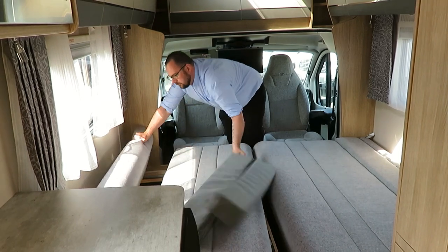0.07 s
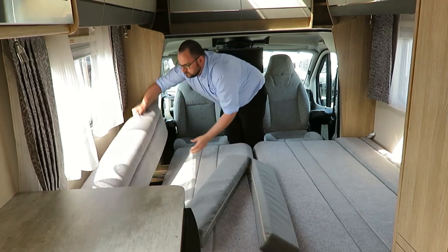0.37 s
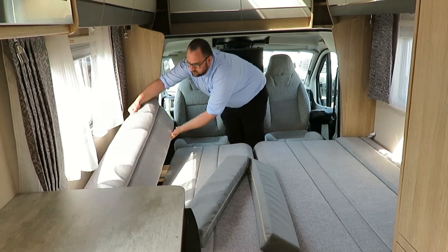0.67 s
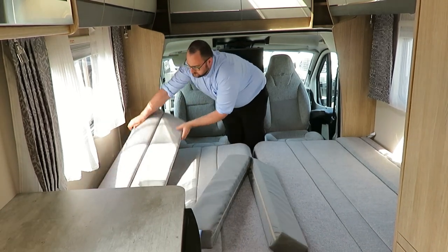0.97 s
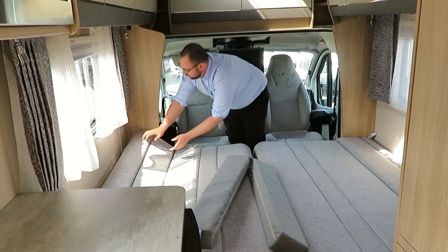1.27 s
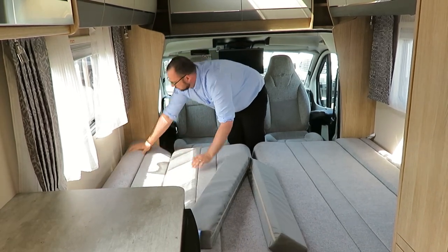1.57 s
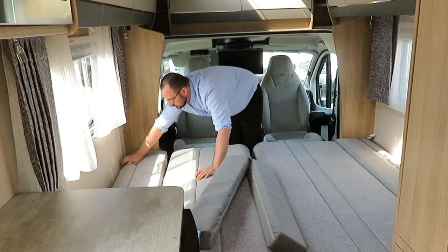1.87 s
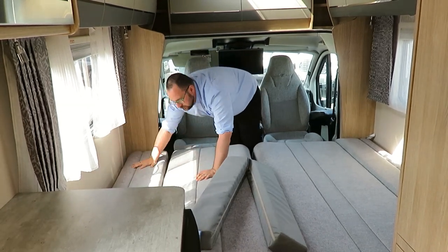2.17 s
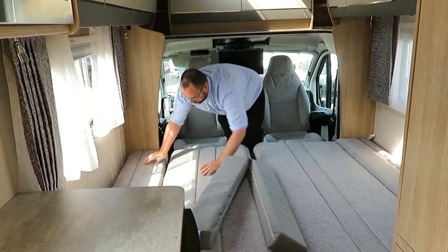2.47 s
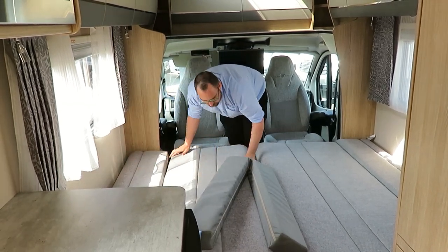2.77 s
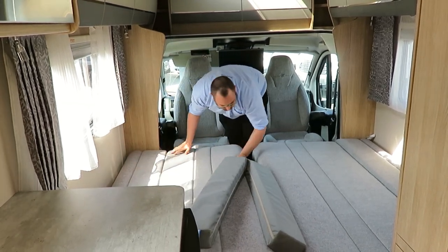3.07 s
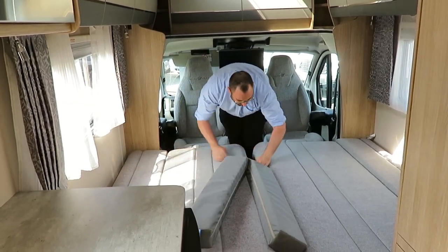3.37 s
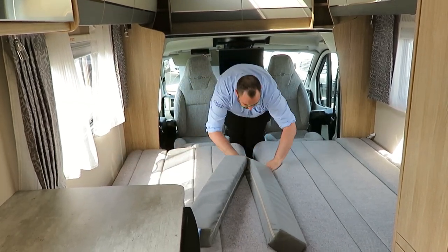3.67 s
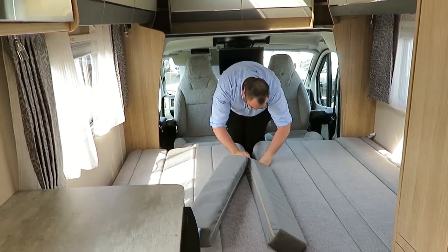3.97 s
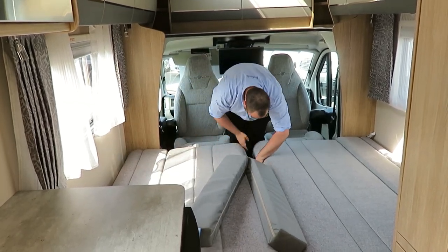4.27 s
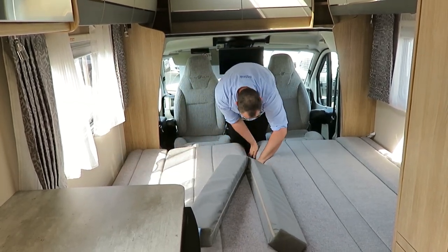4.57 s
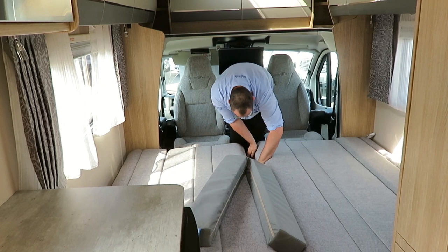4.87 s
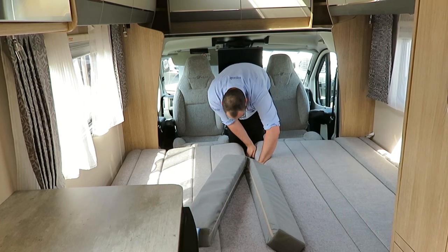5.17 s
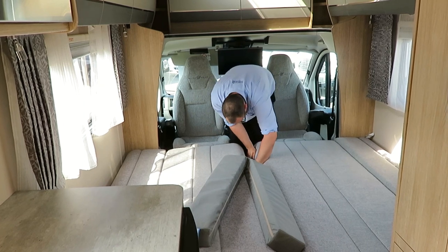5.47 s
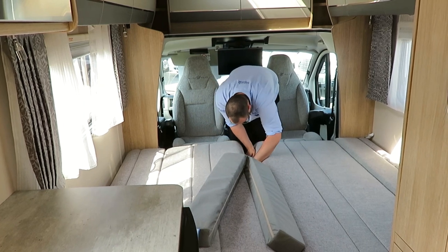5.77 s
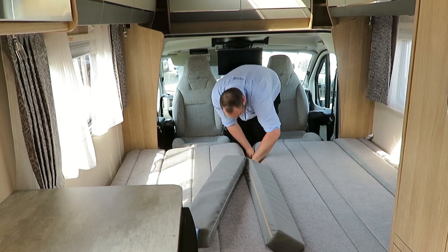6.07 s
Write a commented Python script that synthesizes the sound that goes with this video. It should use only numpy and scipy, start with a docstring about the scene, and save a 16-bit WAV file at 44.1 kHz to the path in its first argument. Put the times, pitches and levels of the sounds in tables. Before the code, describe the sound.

Upholstered cushions are handled nearby in a small, fairly dry motorhome cabin. At about 0.2 seconds a cushion thumps down and knocks hollowly against panelling, followed by bright wooden raps and a tiny tick at 0.35. Another knock comes at 0.7, and fabric drags and scuffs until about 1.4. A bright swish and soft landing at 1.6 lead to the loudest part: deep padded thuds with wooden knocks at 1.9 and 2.2, the second with a loose bench lid slapping down. Light bumps, rustling and a floor rumble follow around 3 seconds, then a thump and clack near 3.6. From 4 seconds the covers rub and scuff quietly as they are pushed into place, with a soft bump at 5.3 and a last thud and knock near 6. A faint low hum and hiss lie underneath.

```python
"""Arranging cushions in a motorhome

Upholstered seat cushions are lifted, dropped and pushed into place on wooden benches.
Foam thuds on the boards, the wood knocks, clacks and rings, and the covers drag and swish
as their weave catches and lets go. The floor rumbles under the shifting weight."""
import sys
import numpy as np
from scipy import signal
from scipy.fft import rfft, irfft
from scipy.io import wavfile

SR = 44100
rng = np.random.default_rng(int(sys.argv[2]) if len(sys.argv) > 2 else 0)


def materialize(psi):
    """Save the field psi as 16-bit PCM at rate SR to the path in sys.argv[1].

    A 1-D psi becomes a single channel; in a 2-D psi each row is a channel.
    """
    bounded = np.clip(np.atleast_2d(psi).T, -1, 1)
    quanta = np.round(bounded * 32767).astype(np.int16)
    wavfile.write(sys.argv[1], SR, quanta)


N = 269451
TIME = np.arange(N) / SR
FREQS = np.maximum(np.arange(N // 2 + 1) * SR / N, 1)

# The notes a plywood bench rings at. Each row: pitch in Hz, width in Hz, boost in dB.
BENCH_NOTES = [(383.3, 13, -4.5), (426, 53, -2), (614, 17, 6.5), (713, 180, 5), (747, 21, -4), (847, 35, 5),
               (1090, 520, 11.5), (1466, 85, 5), (2010, 25, -14), (2284, 47, 6.5), (3120, 86, 4.5)]
# The tone of a knock on a bench. Each row: frequency in Hz, relative level in dB.
KNOCK_TONE = [(60, 21.5), (150, 7), (240, 1.5), (300, 5), (400, 4), (510, -6.5), (720, -7), (1200, -19.5),
              (2500, -7), (6000, -45), (15000, -26)]


def from_db(db):
    """Turn decibels into a number to multiply a sound by."""
    return 10 ** (np.asarray(db) / 20)


def unit_power(x):
    """Scale a sound so that its average power is 1."""
    return x / np.sqrt(np.mean(x ** 2) + 1e-20)


def gain_at(points, hz):
    """Read the gain at any frequency from rows of frequency in Hz and level in dB."""
    known_hz, db = np.transpose(points)
    return from_db(np.interp(np.log(hz), np.log(known_hz), db))


def colour(points):
    """Turn a tone table into a gain for every frequency, falling steeply beyond its ends."""
    lowest_hz, highest_hz = points[0][0], points[-1][0]
    return gain_at(points, FREQS) / (1 + (FREQS / highest_hz) ** 8) / (1 + (lowest_hz / FREQS) ** 4)


def drift(rate_hz):
    """A smooth random wobble, about 1 in size; a higher rate wobbles faster."""
    step = 40  # samples between random values
    values = rng.standard_normal(N // step + 2002)
    r = np.exp(-2 * np.pi * step * rate_hz / SR)
    smooth = signal.lfilter([1], [1, -2 * r, r * r], values)[2000:]
    return np.interp(np.arange(N) / step, np.arange(len(smooth)), unit_power(smooth))


def noise(tone, grain=1, width=None):
    """Stereo noise with a given tone; grain roughens it, width spreads it between the ears."""
    # Sounds in the aisle are narrow in the bass and wide in the treble.
    # Each row: frequency in Hz, stereo width (side minus mid) in dB.
    aisle_width = [(100, -79), (200, -102), (350, -24), (700, -24), (1400, -14), (2800, -7.5), (5500, -4.5),
                   (11000, 2)]
    mid, side = rfft(rng.standard_normal((2, N)) * grain) * tone
    mid = irfft(mid, N)
    side = irfft(side * gain_at(width or aisle_width, FREQS), N)
    return (mid + side * np.array([[1], [-1]])) / mid.std()


def lowpass(x, hz, order=2):
    """Dull a sound by turning down everything above hz."""
    return signal.sosfilt(signal.butter(order, min(hz, SR / 2 - 1), fs=SR, output="sos"), x)


def resonate(x, hz, width_hz):
    """Let through a band around hz; the narrower it is, the longer it rings."""
    r = np.exp(-np.pi * width_hz / SR)
    feedback = [1, -2 * r * np.cos(2 * np.pi * hz / SR), r * r]
    return signal.lfilter(np.array([1, 0, -1]) * (1 - r * r) / 2, feedback, x + 1e-18)


def glide(x, start_hz, end_hz, width_hz, size=64):
    """Make a sound ring at a pitch that slides, in steps of size samples."""
    r = np.exp(-np.pi * width_hz / SR)
    state, out = np.zeros((2, 2)), []
    starts = range(0, x.shape[-1], size)
    for i, hz in zip(starts, np.geomspace(start_hz, end_hz, len(starts))):
        feedback = [1, -2 * r * np.cos(2 * np.pi * hz / SR), r * r]
        block, state = signal.lfilter([1, 0, -1], feedback, x[:, i:i + size], zi=state)
        out.append(block)
    return np.hstack(out)


def fade(t, t60):
    """Die away smoothly; t60 is the fade time, the time it takes to drop by 60 dB."""
    return np.exp(-np.log(1000) * t / t60)


def add(out, start, sound):
    """Mix a sound into out, start seconds in."""
    i = int(start * SR)
    out[..., i:i + sound.shape[-1]] += sound[..., :N - i]


def aftermath(hits, t60):
    """Power that jumps up and dies away at each hit (start in seconds, level in dB)."""
    power, t = np.zeros(N), TIME[:SR]
    for start, db in hits:
        add(power, start, (from_db(db) * fade(t, t60) * (1 - np.exp(-t / 0.0029))) ** 2)
    return power


def bench_tone():
    """The peaks and dips that the benches give to any sound passing through them."""
    return from_db(sum(db / (1 + (2 * (FREQS - hz) / width) ** 2) for hz, width, db in BENCH_NOTES))


def walls(count=14, latest_s=0.022, echo=0.14):
    """Quick echoes off the close walls and ceiling boost some frequencies and weaken others."""
    echoes = np.zeros(N)
    echoes[(rng.uniform(0.001, latest_s, count) * SR).astype(int)] = echo * rng.choice([-1, 1], count)
    echoes[0] = 1
    return np.abs(rfft(echoes)) ** np.clip(FREQS / 1000, 0, 1)


def blows():
    """List every landing and bump of the cushions, in rows laid out like those of bumps."""
    # A cushion drops on a bench. Each row: start in seconds, seconds from edge to flat,
    # then base values for thud level in dB, thud pitch in Hz, knock level in dB, brightness in Hz.
    drops = [(.169, 0.0049, -20.5, 138, -31.5, 656), (1.619, 0.016, -26.5, 120.5, -32.5, 800),
             (1.888, 0.023, -13, 76, -30.5, 714), (2.162, 0.02, -16.5, 86, -25, 1040),
             (3.627, 0.011, -24.5, 96.5, -38, 1000), (5.957, 0.013, -27, 85, -36.5, 1000)]
    # It lands edge first, then flat, then bounces. Each row: delay in edge-to-flat times,
    # thud change in dB, pitch multiplier, knock change in dB, brightness multiplier.
    landing = [(0, -1, 0.733, -4.5, 1.7), (0.999, 1, 1.24, 2, 0.85), (2.799, -5, 1.21, -10.5, 0.5)]
    # A hand or corner bumps a cushion. Each row: start in seconds, relative thud level in dB,
    # thud pitch in Hz, relative knock level in dB, knock brightness in Hz.
    bumps = [(.103, -31, 290, -40.5, 740), (.465, -41, 152, -64, 500), (.683, -25.5, 164, -44, 1350),
             (.85, -32, 174, -65, 900), (.885, -33, 188, -67, 600), (1.52, -26, 102.5, -72, 520),
             (1.797, -15.5, 98.4, -38.5, 550), (1.899, -18, 310, -31, 500), (1.908, -19.5, 165, -36, 400),
             (2.018, -20.5, 46.2, -44, 390), (2.16, -17.5, 62, -31, 500), (2.204, -24, 195, -33.5, 600),
             (2.236, -16, 90, -36.5, 500), (2.383, -36, 153, -42.5, 448), (2.416, -29, 46.7, -49.5, 610),
             (2.853, -40, 118, -47, 650), (2.969, -22, 38, -38, 694), (3.023, -50, 38.3, -40, 504),
             (3.068, -32, 38.8, -44, 640), (3.118, -24.5, 47, -43.5, 550), (3.199, -38, 120, -43.5, 440),
             (3.53, -29.5, 65, -57, 400), (3.599, -33, 53, -33.5, 250), (3.658, -27, 195, -37, 420),
             (3.731, -25.5, 176, -43, 1310), (4.687, -39, 121, -54, 350), (4.728, -41, 151, -67, 350),
             (5.256, -24, 63, -47.5, 600), (5.291, -26, 59.7, -62, 400), (5.962, -25, 54, -48, 400),
             (5.967, -28.5, 167, -49, 600)]
    contacts = [(start + delay * lag, thud_db + thud_step, hz * pitch,
                 knock_db + knock_step, bright_hz * brightness)
                for start, lag, thud_db, hz, knock_db, bright_hz in drops
                for delay, thud_step, pitch, knock_step, brightness in landing]
    return contacts + list(bumps)


def background_noise(level_db=-53.5):
    """A quiet, steady low hum with faint, wide microphone hiss."""
    # Each row: frequency in Hz, relative level in dB.
    background_tone = [(12, -57), (20, 0), (59, 9), (147, -14.5), (242, -7.5), (457, -7), (525, -17),
                       (1110, -26), (12400, -53.5), (15000, -74)]
    # Each row: frequency in Hz, stereo width (side minus mid) in dB.
    background_width = [(60, -40), (110, -12.5), (180, 2.5), (330, -2), (1000, 12.5), (12000, 21.5)]
    return from_db(level_db) * noise(colour(background_tone), width=background_width)


def floor_rumble(shift_gain_db=1.0, shake_db=-12.5, shake_t60=0.52):
    """The floor flexes under the shifting weight and shakes after each blow."""
    # Each row: time in seconds, relative rumble level in dB.
    weight_shifts = [(0.0, -49.5), (.3, -33.5), (.5, -44.5), (.75, -48), (1.3, -44), (1.44, -52),
                     (1.7, -37.5), (2.05, -38.5), (2.45, -39), (2.78, -51.5), (2.99, -29), (3.25, -49.5),
                     (3.48, -48.5), (3.7, -42), (4.1, -55.5), (4.3, -47), (4.75, -42.5), (4.93, -53),
                     (5.32, -40), (5.7, -52), (6.11, -39)]
    # Each row: frequency in Hz, relative level in dB.
    rumble_tone = [(18, 10.5), (29, 1.5), (58, 3.5), (100, -8.5), (170, -7.5), (260, -24.5), (500, -20.5)]
    times, shift_db = np.transpose(weight_shifts)
    flexing = from_db(np.interp(TIME, times, shift_db) + shift_gain_db) ** 2
    shaking = aftermath([(start, db + shake_db) for start, db, *_ in blows()], shake_t60)
    return np.sqrt(flexing + shaking) * noise(colour(rumble_tone))


def cloth_motion(fidget_db=(-67.5, -61, -67), flap_db=(-26.5, -34.5), peak_at=0.54, linger_t60=0.081):
    """How strong swish, rustle and drag are over time, as cloth fidgets, slides and flaps."""
    # A cover or sleeve slides, swelling and dying away. Each row: start in seconds,
    # length in seconds, then relative levels in dB for swish, rustle and drag on the boards.
    strokes = [(0.0, 0.08, -61, -56.5, -52.5), (0.068, 0.16, -56.5, -51.5, -43.5),
               (0.219, 0.24, -55, -50.5, -43), (0.421, 0.071, -54, -46.5, -45),
               (0.446, 0.11, -66, -54.5, -50), (0.485, 0.64, -58.5, -58, -48.5),
               (0.822, 0.16, -54.5, -46.5, -40.5), (0.87, 0.31, -48.5, -48.5, -49),
               (1.012, 0.39, -57.5, -48, -50.5), (1.25, 0.3, -71, -70, -80), (1.502, 0.22, -54, -47, -41.5),
               (1.624, 0.29, -41, -43, -41.5), (1.862, 0.24, -61.5, -54.5, -58),
               (2.138, 0.077, -68, -53, -33.5), (2.194, 0.026, -56, -48, -60),
               (2.326, 0.16, -60.5, -56, -52), (2.854, 0.19, -55, -50, -56),
               (2.937, 0.048, -55.5, -45.5, -49), (3.037, 0.14, -53, -57, -68), (3.14, 0.13, -64, -76, -65),
               (3.444, 0.11, -66, -55.5, -51.5), (3.554, 0.14, -59, -54, -41), (3.666, 0.22, -68, -62, -48),
               (3.85, 0.17, -54.5, -66, -49.5), (4.205, 0.098, -65, -53.5, -45.5),
               (4.405, 0.39, -67, -62.5, -72), (4.978, 0.54, -71, -59.5, -51),
               (5.396, 0.36, -64.5, -63, -82), (5.83, 0.35, -77, -61.5, -53.5)]
    power = from_db(np.array(fidget_db)[:, None] + 0.8 * drift(9.6)) ** 2  # small, endless movements
    for start, length, *levels_db in strokes:
        progress = np.interp(np.linspace(0, 1, int(length * SR)), [0, peak_at, 1], [0, 0.5, 1])
        speed = np.abs(np.sin(np.pi * progress)) ** 0.9
        add(power, start, np.outer(from_db(levels_db), speed) ** 2)
    power *= from_db(0.77 * drift(34)) ** 2  # the cloth sticks and slips
    linger = fade(2 / SR, linger_t60)  # the sound hangs briefly between the walls
    power = signal.lfilter([1 - linger], [1, -linger], power, zi=linger * power[:, :1])[0]
    flaps = aftermath([(start, knock_db) for start, _, _, knock_db, _ in blows()], t60=0.11)
    power[:2] += np.outer(from_db(flap_db) ** 2, flaps)  # a flap adds swish and rustle only
    return np.sqrt(power)


def rubbing(swish, rustle, drag, fast_db=-47.0, drag_db=-2.5, rustle_db=-2.0, swish_db=-1.0):
    """The weave catches and lets go; a fast slide of cover on cover sings out near 5000 Hz."""
    # The tones of a slow swish, a fast slide, a drag on the boards and a rustle.
    # Each row: frequency in Hz, relative level in dB.
    slow_tone = [(2000, 9.5), (4000, 1), (5300, 2), (7500, 0.5), (11000, -2.5), (13500, 2.5), (15500, -13)]
    fast_tone = [(2500, -45), (4300, -9.5), (5250, 2), (6300, -4.5), (8000, -11.5), (12000, -8),
                 (15000, -19)]
    drag_tone = [(110, 18.5), (175, -1), (260, -0.5), (420, 6), (700, -2.5), (1000, -9), (1600, -10)]
    rustle_tone = [(600, 4.5), (1050, -2), (1600, -2.5), (2600, -4), (4000, -8.5), (6000, -14.5),
                   (12000, -38)]
    catches = from_db(2.5 * drift(18.6))
    fibres = from_db(-0.4 * drift(170))
    scratches = from_db(0.1 * drift(400))
    room = walls(echo=0.1)
    fast_share = (1 + np.tanh((20 * np.log10(swish) - fast_db) / 2.5)) / 2
    weave = np.sqrt(1 - fast_share) * noise(colour(slow_tone) * room, scratches)
    weave += np.sqrt(fast_share) * noise(colour(fast_tone) * room, scratches)
    wood = np.sqrt(bench_tone())  # rubbing reaches the boards only weakly, through the foam
    dragging = noise(colour(drag_tone) * wood, catches)
    rustling = noise(colour(rustle_tone) * wood * walls(), np.sqrt(catches) * fibres)
    return (drag * from_db(drag_db) * dragging + rustle * from_db(rustle_db) * rustling
            + swish * from_db(swish_db) * weave)


def crackle(tone, per_second, spread_db, t60, samples):
    """Tiny bursts of noise, random in time and size."""
    snaps = rng.random(N) < per_second / SR
    sizes = from_db(spread_db * np.minimum(rng.exponential(1, N), 3))
    bursts = signal.fftconvolve(snaps * sizes, fade(TIME[:samples], t60))[:N]
    return noise(colour(tone), bursts)


def threads(swish, gain_db=-9.5):
    """Single threads snag and flick free, giving the swish a fine, bright grain."""
    # Each row: frequency in Hz, relative level in dB.
    thread_tone = [(4000, -5), (5500, 2), (8000, -2.5), (11000, -2.5), (14500, -6)]
    flicks = crackle(thread_tone, per_second=450, spread_db=3, t60=0.003, samples=SR // 100)
    return swish * from_db(gain_db) * flicks


def crinkles(rustle, gain_db=-9):
    """Small folds in the covers snap over while they are handled."""
    # Each row: frequency in Hz, relative level in dB.
    fold_tone = [(800, 0), (1700, 12), (3500, -2.5), (8000, -7), (14000, -13)]
    snaps = crackle(fold_tone, per_second=60, spread_db=4, t60=0.093, samples=SR // 40)
    return rustle * from_db(gain_db) * snaps


def foam_thuds(rise_cycles=0.75, fade_cycles=4.82, gain_db=8.5, boom_db=12.0):
    """Foam gives way and springs back a few times; the push sets the floor and cabin air booming."""
    # The notes of the floor and air. Each row: pitch in Hz, fade time in seconds, relative level in dB.
    cabin_notes = [(29.6, 0.35, -1), (64.7, 0.13, -11), (86.8, 0.26, -5.5), (151.3, 0.16, -1.5),
                   (173.3, 0.13, -10.5), (215, 0.87, -21)]
    out, t = np.zeros(N), TIME[:SR // 3]
    for start, db, hz, _, _ in blows():
        cycles = hz * t
        envelope = (1 - np.exp(-(cycles / rise_cycles) ** 2)) * fade(cycles, fade_cycles)
        add(out, start, from_db(db + gain_db) * np.sin(2 * np.pi * cycles) * envelope)
    boom = sum(from_db(db + boom_db) * resonate(out, hz, np.log(1000) / np.pi / t60)
               for hz, t60, db in cabin_notes)
    return out + boom


def bench_knocks(low_t60=0.16, high_t60=0.12, attack_s=0.00066, slap_db=-18, gain_db=-5.5):
    """Each blow rattles the boards; padding dulls it, but a little cloth slap stays bright."""
    out, t = np.zeros((2, N)), TIME[:SR // 3]
    wood = noise(colour(KNOCK_TONE) * bench_tone() * walls())
    low = lowpass(wood, 650, order=1)
    high = wood - low
    hits = blows()
    for (start, _, _, db, bright_hz), i in zip(hits, rng.integers(0, N - len(t), len(hits))):
        part = np.s_[:, i:i + len(t)]
        ring = low[part] * fade(t, low_t60) + high[part] * fade(t, high_t60)
        ring = unit_power(ring * (1 - np.exp(-t / attack_s)))
        padded = lowpass(ring, bright_hz)
        slap = from_db(slap_db) * (ring - padded)
        add(out, start, from_db(db + gain_db) * (padded + slap))
    return out


def bench_ring(gain_db=-8.5, scatter_db=0.5):
    """The main notes of the benches sing on after each blow, with a new strength every time."""
    out, t = np.zeros(N), TIME[:SR // 3]
    hz, _, note_db = np.transpose(BENCH_NOTES)
    t60 = 0.15 * np.sqrt(700 / hz[:, None])  # low notes ring longer
    notes = np.sin(2 * np.pi * hz[:, None] * t) * fade(t, t60)
    for start, _, _, db, bright_hz in blows():
        size, direction = rng.standard_normal((2, len(hz)))
        padding = 1 / np.sqrt(1 + (hz / bright_hz) ** 4)
        strength = from_db(db + gain_db + note_db + scatter_db * size) * gain_at(KNOCK_TONE, hz)
        add(out, start, (np.sign(direction) * strength * padding) @ notes)
    return out


def cover_scuffs(judder_db=0.8, hollow_db=-11):
    """A shoved cover judders: a note slides as it tightens, over the hollow bench and a gritty rasp."""
    # Each row: start in seconds, length in seconds, level in dB, first pitch in Hz,
    # last pitch in Hz, width of the note in Hz, rasp compared with the note in dB.
    shoves = [(0.105, 0.033, -31.5, 302, 390, 50, -25), (0.404, 0.07, -41, 557, 990, 423, -8.5),
              (0.429, 0.082, -48.5, 1280, 2170, 450, -20), (0.902, 0.12, -40.5, 415, 480, 90, -23),
              (0.92, 0.08, -39.5, 627, 583, 30, -14), (1.082, 0.12, -56, 750, 1240, 400, -0.5),
              (1.178, 0.2, -54, 1430, 1700, 300, -16), (1.281, 0.069, -52.5, 420, 340, 130, -13),
              (1.548, 0.072, -47.5, 1440, 1720, 350, -16), (2.397, 0.35, -61, 1540, 1560, 250, -18),
              (2.98, 0.11, -53, 420, 390, 50, -9), (3.187, 0.17, -46, 288, 277, 55, -14.5),
              (3.203, 0.12, -53, 413, 403, 45, -24), (4.19, 0.12, -48.5, 365, 420, 320, -11.5),
              (4.26, 0.13, -46.5, 433, 400, 280, -9.5), (4.422, 0.13, -46, 506, 420, 240, -14),
              (4.552, 0.094, -46.5, 382, 500, 260, -12), (4.676, 0.064, -57, 440, 440, 130, -21),
              (5.004, 0.098, -50, 448, 448, 350, -20), (5.2, 0.091, -50, 420, 480, 403, -8)]
    out = np.zeros((2, N))
    slips = noise(walls(), from_db(judder_db * drift(61)))
    hollow = from_db(hollow_db) * unit_power(lowpass(resonate(slips, hz=165, width_hz=70), 330))
    rasp = unit_power(lowpass(resonate(slips, hz=950, width_hz=900), 1650, order=4))
    for start, length, db, start_hz, end_hz, width_hz, rasp_db in shoves:
        swell = signal.windows.tukey(int(length * SR), 0.68)
        part = np.s_[:, int(start * SR):int(start * SR) + len(swell)]
        note = glide(slips[part], start_hz, end_hz, width_hz)
        note = unit_power(lowpass(note, 0.82 * max(start_hz, end_hz)))
        add(out, start, from_db(db) * (note + hollow[part] + from_db(rasp_db) * rasp[part]) * swell)
    return out


def clacks(attack_s=0.0018, gain_db=4.5):
    """A hard edge of a cushion catches briefly on the woodwork."""
    # Each row: start in seconds, relative level in dB, pitch in Hz,
    # band width divided by pitch, fade time in seconds.
    contacts = [(.168, -42.5, 1390, 1.8, 0.088), (0.337, -34, 1800, 1.05, 0.12),
                (.344, -43, 4800, 1.4, 0.052), (.463, -43, 1930, 0.26, 0.081),
                (.679, -38, 1075, 0.082, 0.052), (0.687, -51, 4940, 1.7, 0.096),
                (0.873, -41, 1200, 0.9, 0.06), (1.622, -38, 1340, 0.81, 0.07),
                (1.892, -35.5, 2540, 0.94, 0.12), (1.941, -41, 1670, 0.6, 0.083),
                (2.163, -35, 2030, 0.65, 0.04), (2.162, -44, 7000, 1.1, 0.022),
                (2.213, -52, 8000, 1.2, .04), (2.852, -49, 590, 0.45, 0.03), (2.952, -49, 7000, 1.6, .07),
                (2.972, -48, 3000, 1.4, 0.05), (3.067, -53, 645, 0.33, 0.035),
                (3.626, -36, 1530, 0.18, 0.039), (3.628, -35, 880, 0.49, 0.066),
                (3.732, -55.5, 2280, 0.74, 0.13), (5.957, -39, 1470, 0.26, 0.068),
                (5.966, -37, 400, 0.42, 0.15)]
    out, t = np.zeros((2, N)), TIME[:SR // 4]
    wood = noise(bench_tone() * walls())
    for (start, db, hz, breadth, t60), i in zip(contacts, rng.integers(0, N - len(t), len(contacts))):
        band = resonate(wood[:, i:i + len(t)], hz, breadth * hz)
        ring = unit_power(resonate(band, hz, breadth * hz))
        add(out, start, from_db(db + gain_db) * ring * fade(t, t60) * (1 - np.exp(-t / attack_s)))
    return out


def struck(hits, notes, attack_s=0.0013, scatter_db=0.7, skew_per_hz=0.00011):
    """An object rings with its own notes at each hit; the higher the note, the more the ears differ."""
    out, t = np.zeros((2, N)), TIME[:SR // 3]
    hz, note_db, t60 = np.transpose(notes)[:, :, None]
    for start, db in hits:
        size, skew = rng.standard_normal((2, len(notes), 1))
        envelope = from_db(db + note_db + scatter_db * size) * fade(t, t60) * (1 - np.exp(-t / attack_s))
        phase, offset = 2 * np.pi * hz * t, skew * skew_per_hz * hz
        add(out, start, np.array([(envelope * np.sin(phase + ear * offset)).sum(0) for ear in (-1, 1)]))
    return out


def panel_knocks():
    """The backrest knocks against the wall panelling, which rings low."""
    # Each row: start in seconds, level in dB.
    hits = [(.171, -29), (.1775, -26.5), (.684, -31.5)]
    # Each row: pitch in Hz, relative level in dB, fade time in seconds.
    panel_notes = [(149, 7, 0.1), (205, -18, 0.056), (296, -4, 0.19), (465, -7.5, 0.083), (694, -33, .12),
                   (880, -18, .1), (1190, -15.5, 0.13)]
    return struck(hits, panel_notes)


def edge_raps():
    """A thin wooden edge is rapped and rings brightly."""
    # Each row: start in seconds, level in dB.
    hits = [(.337, -28), (.3465, -28.5), (.357, -34.5), (.464, -45), (.875, -41)]
    # Each row: pitch in Hz, relative level in dB, fade time in seconds.
    edge_notes = [(383, -12, 0.16), (642, -9.5, 0.12), (738, -7.5, 0.077), (1100, -8, 0.1),
                  (1424, -8, 0.06), (1607, -16, 0.21), (2173, -16, 0.11), (2780, -16, 0.07),
                  (2987, -7, 0.066), (3639, -16, 0.082)]
    return struck(hits, edge_notes)


def small_tick():
    """A small hard part, perhaps a zip pull, gives a short, high tick."""
    # Each row: start in seconds, level in dB.
    hits = [(.3465, -30)]
    # Each row: pitch in Hz, relative level in dB, fade time in seconds.
    tick_notes = [(5093, -18, 0.051), (5760, 0.5, 0.02), (7950, -22, .07), (8950, -6, 0.018),
                  (10600, 3, 0.018)]
    return struck(hits, tick_notes)


def slat_hits():
    """The stiff base of a cushion hits a slat and sets it ringing."""
    # Each row: start in seconds, level in dB.
    hits = [(1.627, -40), (1.891, -25), (1.942, -33.5)]
    # Each row: pitch in Hz, relative level in dB, fade time in seconds.
    slat_notes = [(341, -9, 0.12), (595, -5.5, 0.059), (603, -4.5, 0.087), (925, -13, 0.13)]
    return struck(hits, slat_notes)


def lid_slaps():
    """A loose bench lid slaps down on its frame."""
    # Each row: start in seconds, level in dB.
    hits = [(2.184, -21.5), (2.199, -29.5)]
    # Each row: pitch in Hz, relative level in dB, fade time in seconds.
    lid_notes = [(155, -13, 0.22), (210, -5, 0.24), (267, -10, 0.43), (387.7, -2, 0.15), (626, -14, .18),
                 (706, -3, 0.15), (815, -10, 0.13), (1055, -10, 0.075), (1260, -17, .09),
                 (1905, -19.5, .12)]
    return struck(hits, lid_notes)


def scene():
    """Mix blows, ringing wood, cloth and floor rumble over a quiet hum and hiss."""
    background = background_noise()
    impacts = foam_thuds() + bench_knocks() + bench_ring() + clacks()
    ringing = lid_slaps() + edge_raps() + small_tick() + panel_knocks() + slat_hits()
    swish, rustle, drag = cloth_motion()
    cloth = cover_scuffs() + rubbing(swish, rustle, drag) + threads(swish) + crinkles(rustle)
    return background + impacts + ringing + cloth + floor_rumble()


def record(dry, cutoff_hz=15400):
    """Cut away the very highest treble steeply."""
    return signal.sosfilt(signal.ellip(10, 0.1, 90, cutoff_hz, fs=SR, output="sos"), dry)


dry = scene()
out = record(dry)
materialize(out)
```